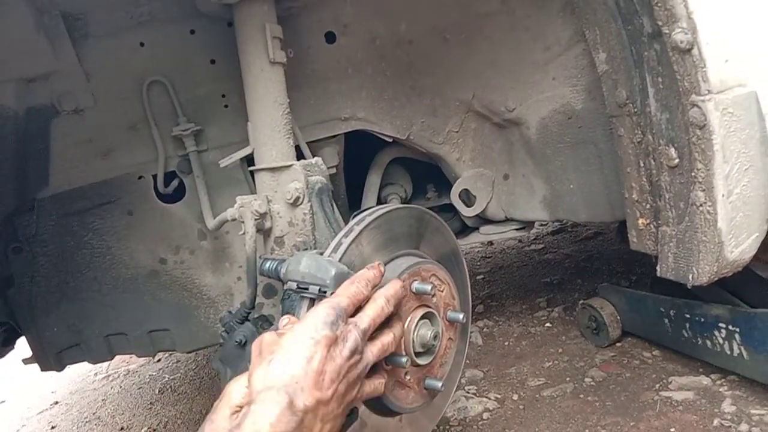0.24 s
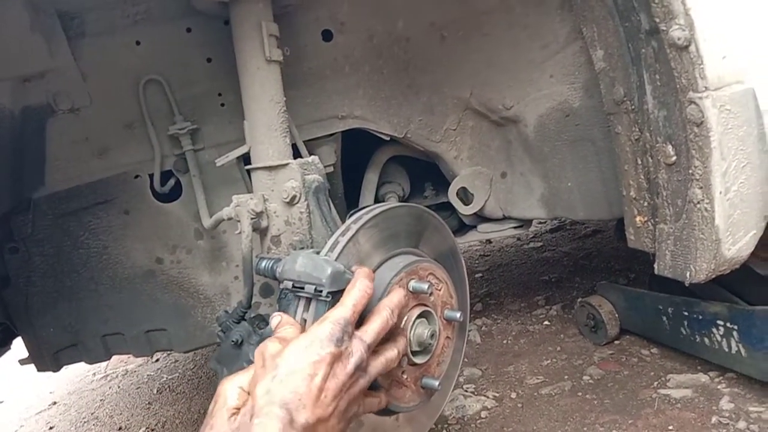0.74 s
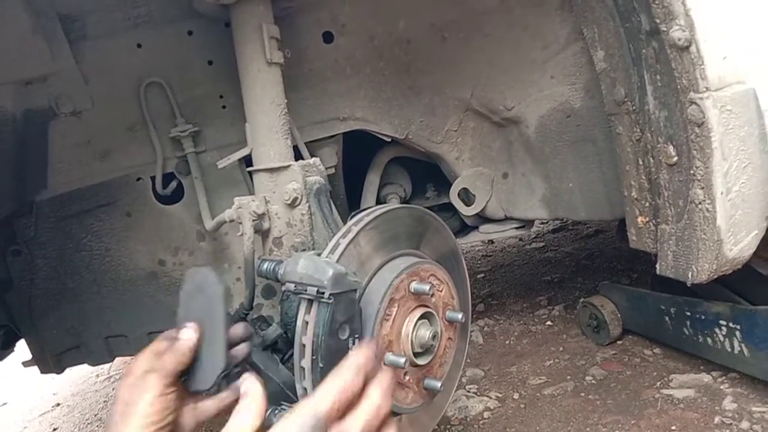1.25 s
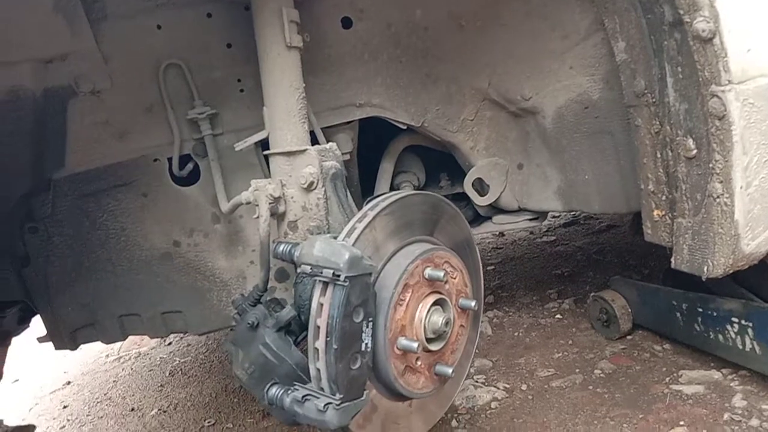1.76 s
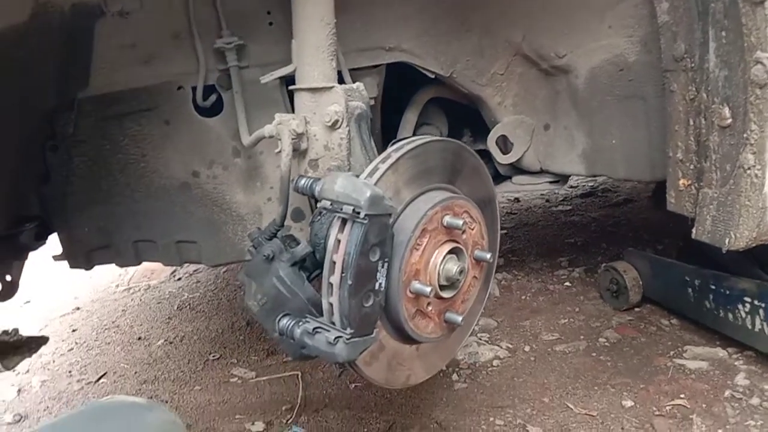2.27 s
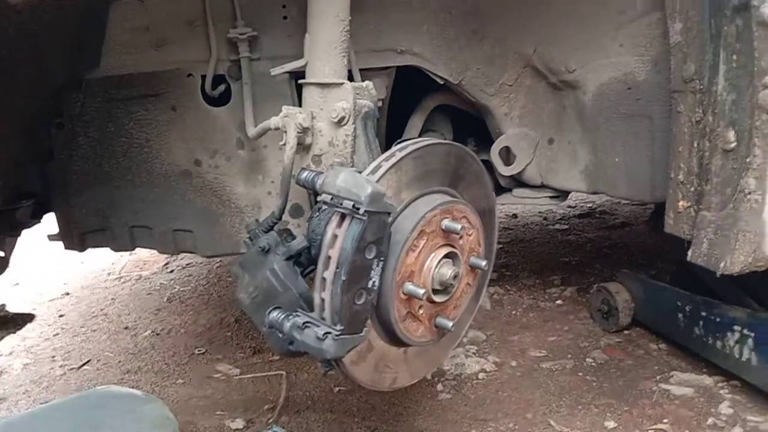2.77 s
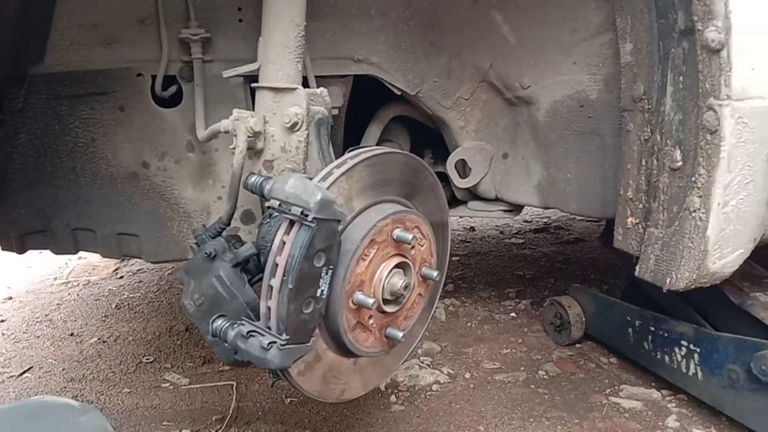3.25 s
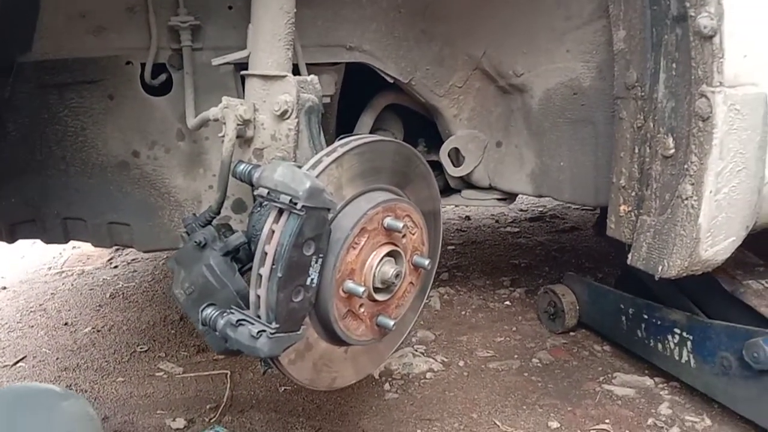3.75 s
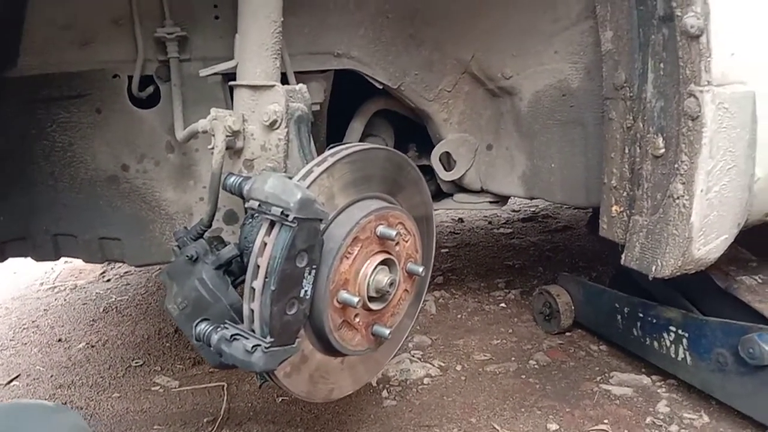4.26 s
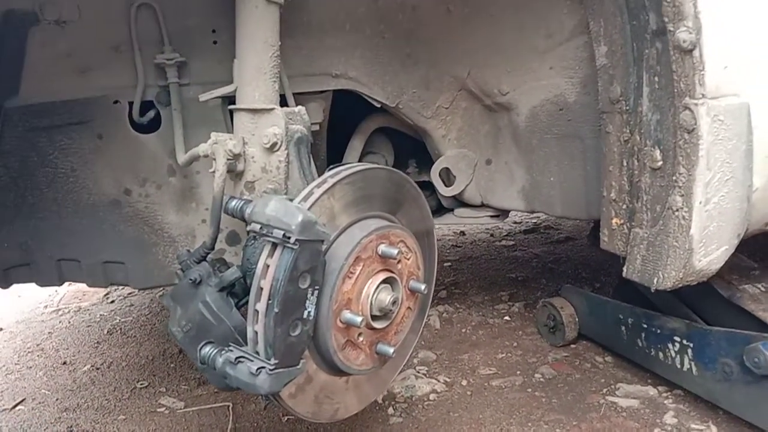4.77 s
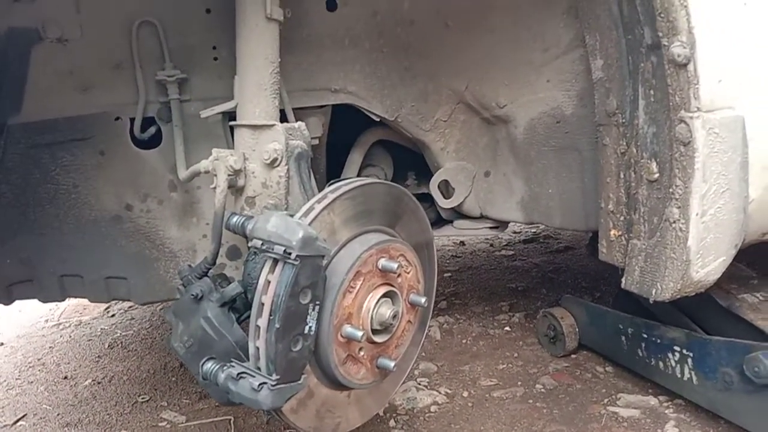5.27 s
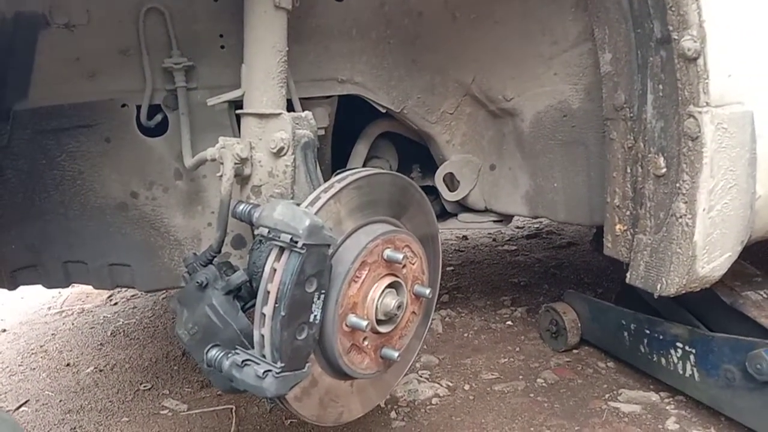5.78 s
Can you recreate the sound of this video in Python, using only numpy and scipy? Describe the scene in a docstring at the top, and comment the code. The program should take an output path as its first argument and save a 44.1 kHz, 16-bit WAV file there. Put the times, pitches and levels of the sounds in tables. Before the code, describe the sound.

In an open repair yard, a pad chatters sharply into its caliper, small tools clink, far blows echo, and a loud hollow clatter erupts midway.

```python
"""A workshop yard heard from beside a car wheel: far machinery washes and hums over low rumble, all of it
filtered noise. A panel is hammered some way off, about four blows a second, as bursts of echoing noise.
Small steel tools clink on ringing modes, dry snaps are noise clicks, and a struck sheet dies away in beating sines.
A pad knocks home in a flurry of bounces, then a handful of parts drops into a box, each knock ringing its modes.
A small microphone feeds both channels, which differ only by a trace."""
import sys
import numpy as np
from scipy import signal
from scipy.fft import rfft, irfft, next_fast_len
from scipy.io import wavfile

SR = 44100
rng = np.random.default_rng(int(sys.argv[2]) if len(sys.argv) > 2 else 0)


def store_pcm(level_fs):
    """Save levels as 16-bit WAV."""
    pcm = np.round(np.clip(level_fs, -1, 1) * 32767).astype(np.int16)
    wavfile.write(sys.argv[1], SR, np.atleast_2d(pcm).T)


def volts(x):
    """Linear amplitude factor 10**(x/20) for a level x in dB, scalar or array-like."""
    e = np.asarray(x, float) / 20
    return 10 ** e


N = 265526
TIME = np.arange(N) / SR


def noise(length):
    """White noise."""
    return rng.standard_normal(length)


def level_rms(x):
    """Scale to rms 1."""
    return x / np.sqrt(np.mean(x ** 2))


def unit(x):
    """Scale to peak 1."""
    return x / np.abs(x).max()


def colour(x, table, tilt=0):
    """Shape a signal's spectrum by (frequency [Hz], level [dB]) points; rms 1."""
    hz, db = np.transpose(table)
    size = next_fast_len(len(x))
    log_hz = np.log(np.maximum(np.arange(size // 2 + 1) * SR / size, 1))
    gain = volts(np.interp(log_hz, np.log(hz), db + tilt))
    return level_rms(irfft(rfft(x, size) * gain, size)[:len(x)])


def resonate(x, peaks):
    """Sum of band resonances (frequency [Hz], width [Hz], level [dB]); rms 1."""
    return level_rms(sum(volts(db) * signal.lfilter(*signal.iirpeak(hz, hz / width, SR), x)
                         for hz, width, db in peaks))


def curve(table):
    """Join (time [s], level [dB]) rows by straight lines."""
    return np.interp(TIME, *np.transpose(table))


def walk(rate):
    """Random levels at 'rate' a second, joined by straight lines."""
    steps = noise(200)
    return np.interp(TIME * rate, np.arange(len(steps)), steps)


def ringing(modes, seconds):
    """One decaying sine a row, from (frequency [Hz], level [dB], t60 [s])."""
    hz, db, t60 = np.transpose(modes)[:, :, None]
    t = np.arange(int(seconds * SR)) / SR
    return volts(db - 60 * t / t60) * np.sin(2 * np.pi * hz * t)


def add(out, s, sound):
    """Mix a sound in at time s."""
    i = int(s * SR)
    out[i:i + len(sound)] += sound[:N - i]


# low rumble, perhaps an idling engine, before its throb: (time [s], level [dB])
RUMBLE_LEVEL = [(0, -49.5), (.55, -56.5), (.9, -52), (2.1, -58), (2.35, -50), (2.8, -52.5), (3.3, -58),
                (3.6, -51.5), (4.1, -59), (4.56, -56.5), (5.0, -57.5), (5.5, -55.5), (6.02, -58)]


def rumble():
    """A narrow low resonance of noise whose level throbs at random."""
    low = resonate(noise(N), [(88.8, 35.4, 0)])
    return low * volts(curve(RUMBLE_LEVEL) + 2.5 * walk(14))


def machine_hum(wash_db):
    """A narrow band of noise that keeps a set distance below the level of the machinery wash."""
    return resonate(noise(N), [(1235, 11, 0)]) * volts(wash_db - 9.5)


# far machinery, the middle of the wash: (time [s], level [dB])
MACHINERY_LEVEL = [(0, -34), (.3, -48), (.55, -52.5), (.9, -43), (1.36, -45.5), (1.9, -47), (2.3, -47),
                   (2.75, -49.5), (2.95, -54), (3.3, -46), (3.55, -52), (4.0, -50), (4.2, -38.5),
                   (4.42, -59), (4.56, -50.5), (4.8, -50.5), (5.5, -47), (5.9, -49.5), (6.02, -59.5)]
# dull low part of the wash, fuller from midway: (time [s], level [dB])
MURK_LEVEL = [(0, -66.5), (1.4, -64.5), (1.9, -66.5), (2.8, -72), (2.95, -57.5), (3.3, -50.5), (3.6, -62.5),
              (4.0, -57), (4.56, -62.5), (5.25, -56), (6.02, -58.5)]
# tone of the wash inside its three parts: (frequency [Hz], level [dB per Hz])
MACHINERY_COLOUR = [(30, 39), (98, 0), (270, -13), (580, -3.5), (840, -10.5), (1090, -9), (1270, 7.5),
                    (1490, -5.5), (3540, -4), (4600, -23.5), (7000, -26.5), (9400, -28), (12500, -30),
                    (15800, -36)]


def yard():
    """Far machinery: noise in narrow bands, each swelling and flickering alone, with its hum."""
    wash_db = curve(MACHINERY_LEVEL)
    hiss_db = -61.5 + 0.21 * (wash_db - wash_db.mean())  # the treble follows a share of the swings
    wash = rfft(colour(noise(N), MACHINERY_COLOUR))
    octave = np.log2(np.maximum(np.arange(len(wash)) * SR / N, 1))
    out = machine_hum(wash_db)
    parts = ((150, 800, curve(MURK_LEVEL)), (800, 4500, wash_db), (4500, 16000, hiss_db))
    for low_hz, high_hz, db in parts:
        edges = np.linspace(np.log2(low_hz), np.log2(high_hz), 9)
        part = np.zeros(N)
        for low, high in zip(edges, edges[1:]):
            band = irfft(wash * (octave >= low) * (octave < high), N)
            part += band * volts(3.2 * walk(16) + 2 * walk(4))  # quick flicker and slow swell
        out += part / part.std() * volts(db)
    return out


# modes of a sheet struck just before: (frequency [Hz], level [dB], t60 [s])
SHEET_MODES = [(297, -1.5, 0.7), (376, -4, 1.24), (435, -13.5, 1.3), (533, -10, 1.5), (898, -9.5, 1.95),
               (1064, -2, 1.7), (1160, -22, 1.3), (1276, 0.5, 1.6), (1420, 1.5, 1.1), (1660, -9.5, 2.9),
               (1784, -5, 2.3), (2190, -10.5, 3.8), (2270, -4, 0.81), (2664, 4, 0.95), (3185, 2.5, 1.2),
               (3190, 4, 0.5), (5380, -7, 0.29)]


def sheet():
    """Each mode is five close neighbours, so it beats as it dies; a duller wash dies far more slowly."""
    t = TIME[:int(1.5 * SR)]
    wash_colour = [(150, -38), (300, 1.0), (700, -19), (1300, 11), (3400, 0), (4500, -53)]
    sound = colour(noise(len(t)), wash_colour) * volts(-44.0 - 60 * t / 8.4)
    shares = (0.82, 0.6, 0.17, 0.54, 0.44)
    splits = (0, 0.011, -0.021, 0.0095, -0.032)  # detuning as a fraction of the mode
    chance = rng.uniform(0, 2 * np.pi, (len(SHEET_MODES), 5))
    for (hz, db, t60), phases in zip(SHEET_MODES, chance):
        cluster = sum(share * np.sin(2 * np.pi * hz * (1 + split) * t + phase)
                      for share, split, phase in zip(shares, splits, phases))
        sound += volts(-36.5 + db - 60 * t / t60) * cluster
    return np.pad(sound, (0, N - len(t)))


# short swishes, many just ahead of a blow: (time [s], peak level [dB])
SWISH_HITS = [(0.099, -33), (0.613, -37.5), (0.821, -31.5), (1.369, -36), (1.616, -42), (2.134, -35),
              (2.395, -40.5), (2.569, -36.5), (2.626, -38), (2.891, -33), (3.103, -41.5), (3.144, -34),
              (3.973, -35.5), (4.032, -39), (5.879, -39)]


def swishes():
    """Brief high hiss of dragging steel: noise through the same resonance twice."""
    out, t = np.zeros(N), np.arange(int(0.3 * SR)) / SR
    band = [(5380, 2160, 0)]
    rise_s, fade_s = 0.015, 0.047
    shape = np.minimum(t / rise_s, 1) * np.exp(-(t / fade_s) ** 2)
    for s, db in SWISH_HITS:
        hiss = resonate(resonate(noise(len(t)), band), band)
        add(out, s - rise_s / 2, volts(db) * unit(hiss * shape))
    return out


# distant blows: (time of the loudest moment [s], level [dB], brightness from 1.8 to 3.7 kHz [dB], rise [s])
HAMMER_BLOWS = [(0.17, -35.5, 0, 0.026), (0.41, -29.5, 7, .028), (0.684, -32.5, -9.5, .035),
                (0.95, -36, -12, 0.022), (1.183, -31.5, -10.5, 0.021), (1.423, -32.5, -10, 0.021),
                (1.717, -44, 7, 0.019), (1.843, -36.5, 12.5, 0.019), (1.942, -31, 4, 0.02),
                (2.196, -31, -11.5, 0.024), (2.458, -36, -10.5, 0.025), (2.942, -28.5, -9, 0.026),
                (3.213, -31.5, -11, 0.032), (4.894, -34, 8, .016), (5.095, -25.5, 14, 0.026),
                (5.342, -31.5, 9, 0.03), (5.562, -32, 4.5, 0.022), (5.802, -33.5, 5, 0.034)]
# tone of the panel before each blow's tilt: (frequency [Hz], level [dB per Hz])
PANEL_COLOUR = [(120, -66), (250, -6.5), (400, -5.5), (750, -4.5), (850, -16.5), (950, -6), (1240, -4.5),
                (2400, 2), (3800, 0), (4700, -5), (6500, -12), (8000, -20), (9800, -14.5), (15800, -36)]
# resonances of the panel: (frequency [Hz], width [Hz], level [dB])
PANEL_RESONANCES = [(967, 49, 10), (1225, 90, 1.5), (1773, 12, 7.5), (2325, 87, -9), (2730, 110, -23.5),
                    (2966, 110, -1), (3350, 120, -3), (3570, 19, -4.5)]


def hammer():
    """Far off, each blow arrives as a crowd of echoes: a rounded rise, a quick fall, a longer tail."""
    out, t = np.zeros(N), np.arange(int(0.5 * SR)) / SR
    hz = np.array(PANEL_COLOUR)[:, 0]
    for s, db, bright_db, rise in HAMMER_BLOWS:
        echoes = noise(len(t)) * volts(5.05 * noise(len(t)))
        clumps_db = 1.5 * np.interp(t / 0.002, np.arange(len(t)), noise(len(t)))  # 2 ms clumps
        echoes *= volts(clumps_db)
        # a dull blow also loses bass, a bright one also wins treble
        ends_db = [0.95 * min(bright_db, 0), -bright_db / 2, bright_db / 2, 0.27 * bright_db]
        tilt = np.interp(np.log(hz), np.log([895, 1780, 3700, 5370]), ends_db)
        ring = 0.44 * resonate(echoes, PANEL_RESONANCES)
        body = colour(echoes / echoes.std() + ring, PANEL_COLOUR, tilt)
        after = np.maximum(t - rise, 0)
        fall = volts(-60 * after / 0.2) + volts(-11.5 - 60 * after / 0.5)
        shape = np.sin(np.pi / 2 * np.minimum(t / rise, 1)) ** 2 * fall
        add(out, s - rise, volts(db) * body * shape)
    return out


def squeak():
    """A thin sine that glides up, fast at first, between soft edges."""
    start_s, length_s, edge_s = 5.47, 0.155, 0.018
    low_hz, top_hz, bend_s = 1780, 3120, 0.11
    t = np.maximum(TIME - start_s, 0)
    hz = top_hz - (top_hz - low_hz) * np.exp(-t / bend_s)
    gain = np.clip(np.minimum(t, length_s - t) / edge_s, 0, 1)
    return np.sqrt(2) * volts(-50) * gain * np.sin(2 * np.pi * np.cumsum(hz) / SR)


def scuff():
    """A low uneven drag of resonant noise before the parts drop."""
    start_s, length_s = 3.72, 0.34
    drag = np.sin(np.pi * np.clip((TIME - start_s) / length_s, 0, 1))
    return drag * resonate(noise(N), [(910, 700, 0)]) * volts(-49.5 + 3.2 * walk(30))


# dry snaps: (time [s], peak level [dB])
SNAP_HITS = [(3.358, -32), (4.77, -17)]
# tone of a snap: (frequency [Hz], level [dB per Hz])
SNAP_COLOUR = [(200, -19), (400, -1), (2500, -5), (4000, -16), (7000, 4), (10000, -2), (15500, -10)]


def snaps():
    """Broad noise clicks that hardly ring: a sharp fall and a faint longer one."""
    out, t = np.zeros(N), TIME[:int(0.1 * SR)]
    fall = np.exp(-t / 0.0017) + 0.13 * np.exp(-t / 0.011)
    for s, db in SNAP_HITS:
        add(out, s, volts(db) * unit(colour(noise(len(t)), SNAP_COLOUR) * fall))
    return out


# steel tools: (time [s], level [dB], loudest region [Hz], rattle [s], t60 of the jingle [s])
TOOL_CLINKS = [(0.081, -42.5, 10900, 0.013, .3), (0.312, -30, 9700, 0.024, 1),
               (0.831, -27.5, 12900, 0.0023, 0.041), (1.106, -32.5, 9600, 0.019, 0.46),
               (1.756, -24.5, 11100, 0.051, 0.4), (1.768, -33, 3920, 0.0087, 0.25),
               (2.037, -45.5, 10900, 0.013, 0.14), (2.267, -32, 8400, 0.0075, 1),
               (2.752, -28.5, 7300, 0.0055, 0.29), (3.357, -33, 3500, 0.0023, .05),
               (3.375, -31.5, 3660, 0.0034, 0.06), (3.464, -37, 3370, 0.0076, 0.11),
               (3.465, -41, 6700, 0.0067, 0.26), (3.541, -45, 8550, 0.014, 0.67),
               (3.548, -38.5, 2050, 0.044, 0.93), (3.667, -27.5, 4650, 0.013, 0.14),
               (3.676, -21, 3780, 0.0077, 0.064), (3.677, -34.5, 7000, 0.0064, 0.14),
               (3.69, -34, 2760, 0.0068, 0.19), (4.544, -36, 6400, 0.0077, 0.12),
               (5.246, -36, 7700, 0.01, 0.49), (5.455, -35.5, 5900, .0071, 0.19),
               (5.665, -31, 7060, .012, 0.25), (5.711, -28.5, 11900, 0.04, 0.26),
               (5.727, -39, 3620, 0.032, .3)]
# modes of the steel before each clink's scatter: (frequency [Hz], level [dB], t60 [s])
STEEL_MODES = [(2050, 0, .1), (2880, -2, .12), (3400, 0, .06), (3730, 0, .06), (4060, 0, .07),
               (4380, -2, .12), (5580, -2, .07), (5850, -3, .06), (6315, -2, .06), (6790, 0, .06),
               (7150, 0, .06), (7400, -2, .06), (7810, 0, .08), (8690, 0, .1), (9110, 0, .06),
               (9490, 0, .07), (9830, 0, .06), (10180, 0, .06), (10660, 0, .08), (11590, 2, .07),
               (12890, 2, .07), (14140, 2, .07), (15130, 0, .06)]
# higher clinks reach a wider region: (frequency [Hz], reach [octaves])
CLINK_REACH = [(2000, 0.14), (3600, 0.091), (4500, 0.45), (8000, 1)]


def clinks():
    """A short rattle of contacts and its jingling tail keep exciting the steel modes near the struck region."""
    out, t = np.zeros(N), np.arange(int(0.5 * SR)) / SR
    hz = np.array(STEEL_MODES)[:, 0]
    modes = ringing(STEEL_MODES, 0.25)
    chance = rng.standard_normal((len(TOOL_CLINKS), len(hz)))
    for (s, db, centre_hz, rattle, t60), scatter in zip(TOOL_CLINKS, chance):
        spread = np.interp(centre_hz, *np.transpose(CLINK_REACH))
        reach = np.exp(-0.5 * (np.log2(hz / centre_hz) / spread) ** 2)
        grit = noise(len(t)) * volts(1.07 * noise(len(t)))
        contacts = grit * np.sqrt(t / rattle) * np.exp(-t / rattle)
        jingle = contacts + 0.27 * grit * volts(-60 * t / t60)
        struck = (reach * volts(4 * scatter)) @ modes
        ring = signal.fftconvolve(jingle, struck)[:len(t)]
        # the tick itself is broad noise over the same region
        region = [(centre_hz * 2 ** (k * spread), -5 * k * k) for k in range(-4, 5)]
        tick = unit(colour(jingle, region))
        add(out, s - 0.001, volts(db) * (volts(-1) * unit(ring) + tick))
    return out


SEATED_S = 0.773  # the pad is home
# hollow wheel arch, the lowest tone blooming last: (frequency [Hz], level [dB], t60 [s], bloom [s])
ARCH_TONES = [(449, -16.5, 0.11, 0.0071), (341, -36, 0.33, 0.035), (255.5, -29, 0.26, 0.018),
              (215, -30.5, 0.52, 0.0083), (118, -24, 0.22, 0.055), (806, -32, 0.47, 0.013)]


def arch():
    """The hollow arch answers the pad late: sines that swell, waver and die."""
    out, t = np.zeros(N), TIME[:int(0.6 * SR)]
    bend = 0.0039 * np.exp(-t / 0.0076)  # the pitch starts high and drops quickly
    for hz, db, t60, bloom in ARCH_TONES:
        waver_db = 6.6 * walk(48)[:len(t)]
        swell = (1 - np.exp(-t / bloom)) ** 2 * volts(db - 60 * t / t60 + waver_db)
        add(out, SEATED_S, swell * np.sin(2 * np.pi * hz * (t - bend)))
    return out


# the pad chatters into its clip: (time [s], peak level of the ring [dB])
PAD_BOUNCES = [(0.731, -28), (0.733, -30), (0.737, -32), (0.741, -39), (0.757, -42), (0.769, -20),
               (0.7717, -9), (0.774, -7.5), (0.7767, -10), (.7782, -7), (0.782, -10), (.787, -17),
               (.794, -20), (0.803, -39), (0.812, -32), (0.821, -18.5)]
# modes of the caliper before each bounce's scatter: (frequency [Hz], level [dB], t60 [s])
CALIPER_MODES = [(1380, -19.5, 0.96), (1180, -34, .04), (1310, -15, 0.11), (1490, 4.5, 0.044),
                 (1640, -15, 0.022), (1870, 12.5, 0.018), (2010, 5, 0.024), (2720, -24, 0.042),
                 (3360, 3.5, 0.037)]
# tone of the scrape: (frequency [Hz], level [dB per Hz])
SCRAPE_COLOUR = [(500, -31), (900, 0), (2700, 1.5), (4400, -8.5), (6000, -19.5), (10000, -21.5),
                 (15500, -20)]


def seat():
    """Quick bounces of the pad ring the caliper modes and scrape alike, the scrape fading once it is home."""
    out, modes, t = np.zeros(N), ringing(CALIPER_MODES, 0.5), TIME[:2000]
    chance = rng.standard_normal((len(PAD_BOUNCES), len(CALIPER_MODES)))
    for (s, db), scatter in zip(PAD_BOUNCES, chance):
        ring = np.convolve(volts(3.0 * scatter) @ modes, np.hanning(13))  # a soft contact
        add(out, s, volts(db) * unit(ring))
        scrape_db = -18.5 - 250 * max(s - SEATED_S, 0)  # fades 250 dB a second
        scrape = colour(noise(len(t)), SCRAPE_COLOUR) * np.exp(-t / 0.01)
        add(out, s, volts(scrape_db) * unit(scrape))
    return out


# strikes on a steel rod: (time [s], peak level [dB])
ROD_STRIKES = [(4.09, -30), (4.256, -29), (4.301, -12), (4.305, -46)]
# modes of the rod: (frequency [Hz], level [dB], t60 [s])
ROD_MODES = [(1882, 8.5, 0.22), (1950, -37, .12), (2330, -14.5, 0.5), (2380, -21, 0.46), (720, -21.5, 0.83),
             (2440, -8, 0.074), (5170, -5, 0.069), (7800, -7.5, 0.09)]


def rod():
    """A steel rod rings its modes under a very short contact."""
    out = np.zeros(N)
    ring = unit(np.convolve(ringing(ROD_MODES, 0.29).sum(axis=0), np.hanning(7)))
    for s, db in ROD_STRIKES:
        add(out, s, volts(db) * ring)
    return out


# near knocks on the box: (time [s], thud peak [dB], contact [ms], rattle peak [dB])
BOX_KNOCKS = [(4.059, -16.5, 1.77, -21), (4.065, -27, 0.63, -46), (4.091, -3.5, 0.7, -12.5),
              (4.096, -43, 0.69, -26), (4.11, -10.5, 1, -22), (4.116, -42, .35, -32),
              (4.13, -14, 0.39, -14.5), (4.156, -38, 0.18, -12), (4.168, -7.5, 0.84, -12),
              (4.174, -7, 0.28, -16), (4.198, -48, .8, -47), (4.215, -44, 0.52, -30),
              (4.23, -23.5, 1.8, -20), (4.240, -15, 0.55, -16.5), (4.257, -14, 0.38, -20),
              (4.296, -19, 2.9, -18), (4.301, -32.5, .26, -34), (4.322, -7.5, 1.58, -11.5),
              (4.329, -12.5, 1.2, -28), (4.34, -17, 3.23, -23), (4.362, -28, 1.1, -21.5),
              (4.384, -34, 1.3, -28), (4.41, -30, 0.71, -37)]
# modes of the box before each knock's scatter: (frequency [Hz], level [dB], t60 [s])
BOX_MODES = [(92, 4.5, 0.078), (144, 9, 0.086), (205, 2, 0.069), (313, 15, 0.029), (396, 7, 0.03),
             (508, 16, 0.037), (640, 1.5, 0.057), (1020, 0, 0.014), (1286, 4, 0.046), (1670, -20, 0.044),
             (1710, 4, 0.03), (2180, -18, 0.037), (3500, -33, .03)]
# tone of the loose bits: (frequency [Hz], level [dB per Hz])
RATTLE_COLOUR = [(290, -42), (500, -21), (960, 4.5), (2200, 1.5), (2870, -7), (3470, -2), (4800, -13.5),
                 (6800, -12), (9100, -17), (15800, -23)]


def clatter():
    """Each part pushes the box with a half-sine, whose change drives the modes; loose bits rattle after it."""
    out, modes = np.zeros(N), ringing(BOX_MODES, 0.35)
    t = np.arange(modes.shape[1]) / SR
    chance = rng.standard_normal((len(BOX_KNOCKS), len(BOX_MODES)))
    for (s, thud_db, contact_ms, rattle_db), scatter in zip(BOX_KNOCKS, chance):
        push = np.sin(np.pi * np.clip(t[:200] * 1000 / contact_ms, 0, 1))
        thud = np.convolve(volts(3.8 * scatter) @ modes, np.diff(push))[:len(t)]
        grit = noise(len(t)) * volts(3.2 * noise(len(t)))
        bits = colour(grit, RATTLE_COLOUR) * np.exp(-t / 0.013)
        add(out, s, volts(thud_db) * unit(thud) + volts(rattle_db) * unit(bits))
    return out


# what the walls return: (frequency [Hz], level [dB])
WALL_COLOUR = [(60, 4), (400, 7.5), (2000, 0.5), (5000, -9), (15000, 5)]


def room(x):
    """Walls and car body return a decaying cloud of echoes."""
    t = TIME[:int(0.8 * SR)]
    t60_s, build_s = 0.3, 0.02
    echoes = colour(noise(len(t)), WALL_COLOUR) * volts(-60 * t / t60_s) * np.minimum(t / build_s, 1)
    echoes /= np.sqrt(np.sum(echoes ** 2))
    return volts(-15.5) * signal.fftconvolve(x, echoes)[:N]


# tone of the trace by which the channels differ: (frequency [Hz], level [dB])
TRACE_COLOUR = [(30, -4), (80, -3), (150, 12), (1200, 15.5), (2500, 12), (5000, 21.5), (9000, 2),
                (14000, 26)]


def scene():
    """Mix background, hits and their room echoes; a faint recoloured copy sets the channels apart."""
    far = hammer() + swishes()
    near = squeak() + scuff() + snaps() + clinks() + arch() + seat() + rod() + clatter()
    hits = far + near
    mid = rumble() + yard() + sheet() + hits + room(hits)
    side = colour(np.roll(mid, 40), TRACE_COLOUR) * volts(-32) * mid.std()
    return np.array([mid + side, mid - side])


def roll_off(x):
    """The treble ends steeply here."""
    return signal.sosfilt(signal.butter(12, 16640, fs=SR, output="sos"), x)


# response of the microphone before its bass cut: (frequency [Hz], level [dB])
MICROPHONE_RESPONSE = [(20, 5), (4000, -1.5), (4700, -6), (6500, -2), (10000, -1.5), (11500, -11.5),
                       (13000, -17.5), (15200, -1), (15750, -10), (15950, -70)]


def record(dry):
    """A small microphone: uneven treble, then a bass cut below 70 Hz."""
    heard = np.array([colour(channel, MICROPHONE_RESPONSE) * 0.81 * channel.std() for channel in dry])
    bass_cut = signal.butter(2, 70, "high", fs=SR, output="sos")
    heard = signal.sosfilt(bass_cut, heard)
    return roll_off(heard)


dry = scene()
out = record(dry)
store_pcm(out)
```